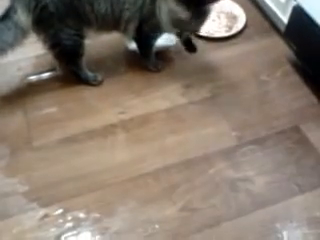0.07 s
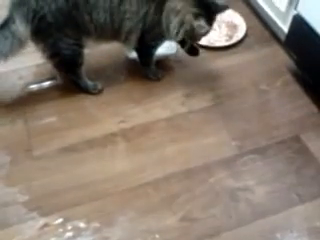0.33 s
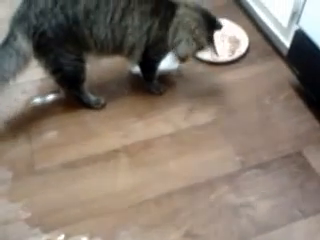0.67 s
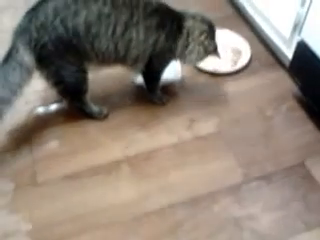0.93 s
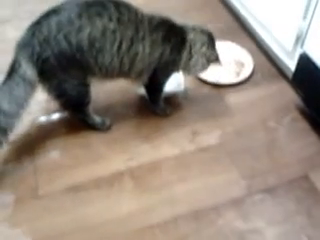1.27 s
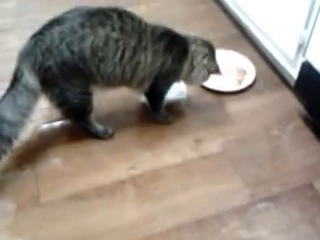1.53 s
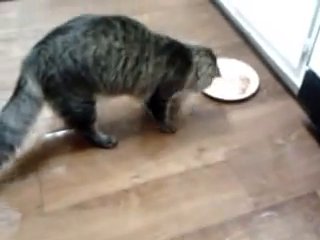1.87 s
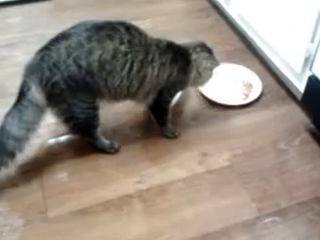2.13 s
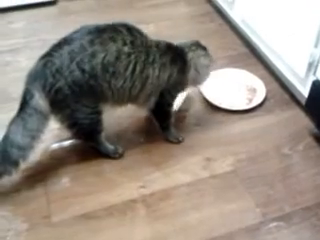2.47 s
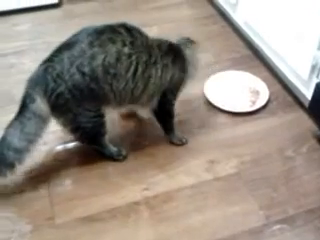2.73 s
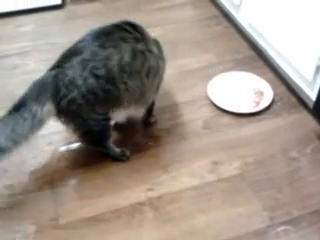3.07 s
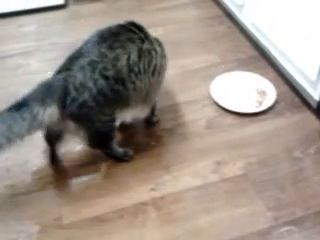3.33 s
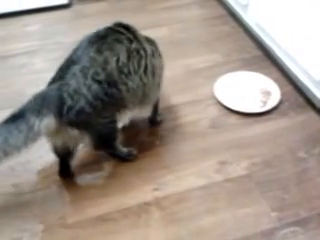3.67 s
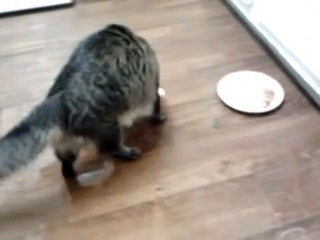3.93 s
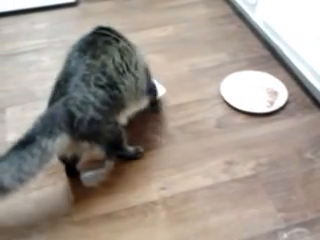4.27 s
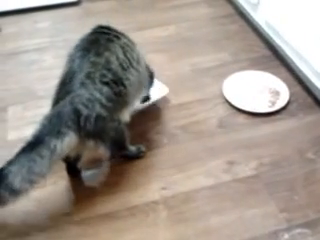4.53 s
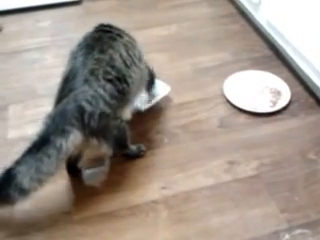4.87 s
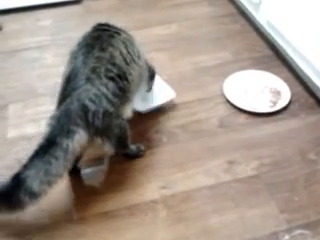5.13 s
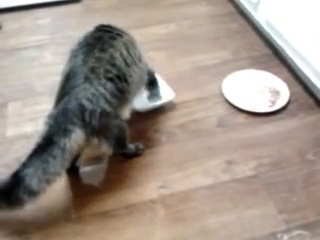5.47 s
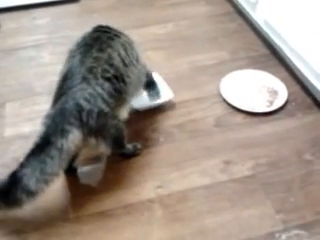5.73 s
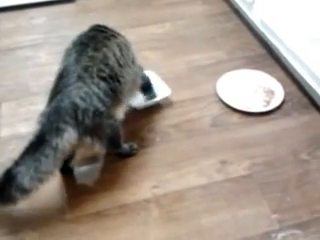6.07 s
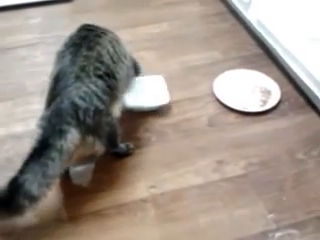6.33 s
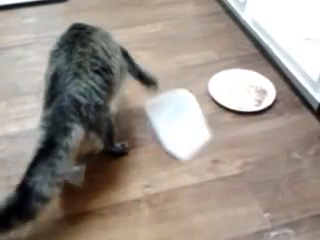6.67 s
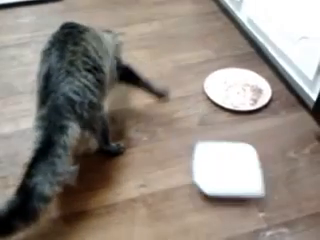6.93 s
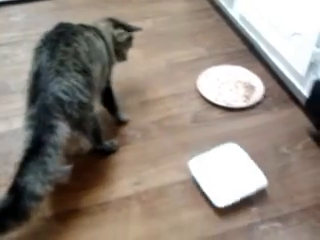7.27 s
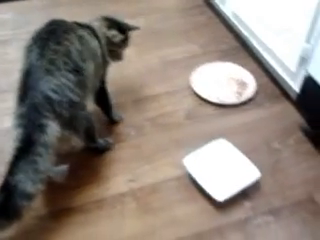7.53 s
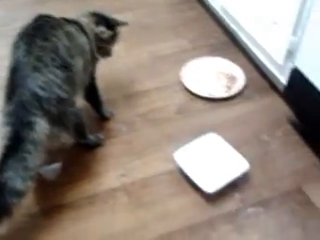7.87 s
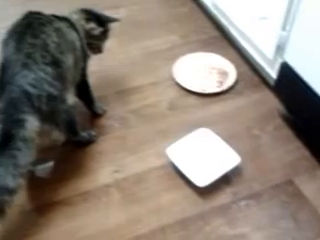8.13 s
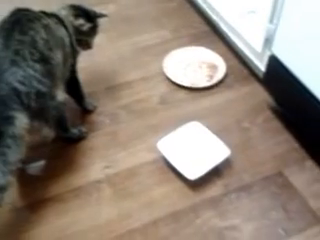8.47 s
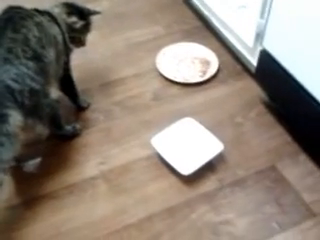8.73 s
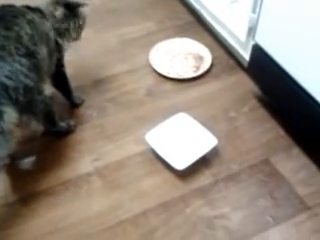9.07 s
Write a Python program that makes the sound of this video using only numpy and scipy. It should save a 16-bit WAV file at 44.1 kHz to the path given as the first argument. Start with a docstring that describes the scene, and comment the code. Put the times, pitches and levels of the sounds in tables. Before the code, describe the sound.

A low, steady rush of air fills a quiet, slightly reverberant kitchen. At about 1.8 seconds a cat's claw taps a small hard dish, which rings lightly. Two short, soft scrapes follow near 2 and 3 seconds as the dish slides on the laminate floor, mixed with faint clinks and padded thumps. Just after 4 seconds the dish tips and drops back with a clack and a hollow thud, then rocks through several smaller knocks until about 5 seconds. Light ringing taps and claw scratches continue to 6 seconds, and a brief slide comes around 6.5. Near 6.8 seconds the dish is flipped: it skids with a rasp, lands with a bright clink and bounces in the loudest clatter, thudding on the boards and settling by about 7.8 seconds. A soft paw step follows at 8 seconds and one faint scuff near 8.6.

```python
"""A cat paws a small hard dish over a laminate floor in a quiet kitchen. First its claws tap the dish
into free vibration, and stick-slip friction rasps as it is dragged. Near 4 s the dish tips and drops
back, driving the floorboards, and more clinks follow. Near 7 s it is flipped, skids, bounces and
settles upside down; one faint scuff comes last. Throughout, the small room reverberates over a low,
steady rush of air."""
import sys
import numpy as np
from scipy import signal
from scipy.fft import rfft, irfft
from scipy.io import wavfile
from scipy.ndimage import uniform_filter1d

SR = 44100
rng = np.random.default_rng(int(sys.argv[2]) if len(sys.argv) > 2 else 0)


def transcribe(u):
    """Save the signal u as a 16-bit wav file named by the first command-line argument.

    u: samples, shape (n,) or (channels, n), limited to [-1, 1]; the rate is SR.
    q: integer samples, one column per channel.
    """
    v = np.clip(np.atleast_2d(u).T, -1, 1)
    q = np.round(v * 32767).astype(np.int16)
    wavfile.write(sys.argv[1], SR, q)


N = 405719
T = np.arange(SR) / SR  # time since a blow, t/s

# landings of the dish: t/s, force level/dB, flatness (0 tilted, 1 face-on), edge level/dB,
# ring level/dB, contact spot (0 foot, 1 corner)
LANDINGS = [(3.575, -36, 0.38, -40, -35, 0), (4.176, -19.5, 0.54, -28, -31, 0.51),
            (4.191, -24, 0.72, -39, -39.5, 0.94), (4.408, -25.5, 0.38, -31, -46.5, 0),
            (4.595, -28, 0.21, -49, -44, 0.1), (4.717, -26.5, 0.32, -44.5, -50, .5),
            (4.822, -28.5, 0.34, -50, -40, 0.44), (4.893, -36.5, 0.4, -50, -52, .6),
            (6.972, -24, 0.28, -24.5, -15.5, 0.54), (7.009, -29, 0, -31.5, -19, 0.47),
            (7.195, -20.5, 1, -23.5, -29.5, 0.61), (7.213, -24, 0.53, -35, -47, .6),
            (7.305, -29, 0.67, -44, -45.5, 0.8), (7.51, -25, 0.73, -41, -32, 0.63),
            (7.647, -28.5, 0.5, -28, -49, .55), (7.727, -35, 0.69, -38, -55, 0.6)]
# modes during contact: f/Hz, level/dB, T60/s
CLACK_MODES = [(995, -3.5, 0.015), (1029, -13.5, 0.08), (1102, -10, 0.035), (1235, -11.5, 0.016),
               (778, -37, 0.81)]  # dish and board together
RIM_MODES = [(1486, 2, 0.1), (1630, 0.5, 0.12), (1850, 4, 0.088), (1860, 1.5, 0.098), (2360, -16, 0.077)]  # rim pressed on the floor
# impact spectra: f/Hz, level/dB
THUD_SPECTRUM = [(45, -39.5), (85, 0), (125, -6), (155, 0), (230, -12), (400, -22.5), (1000, -51.5)]
KNOCK_SPECTRUM = [(150, -6.5), (280, 6.5), (450, 2), (750, -4.5), (1100, -19.5), (2000, -48)]
RAP_SPECTRUM = [(300, -26), (700, -3.5), (1500, -4), (2000, -4), (2800, -5), (3500, -17.5), (4200, -11.5),
                (7000, -35.5)]
CRACK_SPECTRUM = [(1500, -8), (3000, 6.5), (4200, -5), (5100, 7), (5900, -1.5), (6500, 1.5), (7200, -8.5)]
def landings():
    """Impact excitation: the floor thuds and knocks, the hollow clacks, the rim raps, the edge cracks."""
    out = np.zeros(N)
    flip_s, loose_boards_db = 6.7, 6.5  # once flipped, the dish lands where the floor booms more
    for s, force_db, flatness, edge_db, _, _ in LANDINGS:
        t60 = np.interp(flatness, [0, 1], [0.12, 0.035])  # tilted it chatters on; flat it stops dead
        thud_db = force_db - 8 + loose_boards_db * (s > flip_s)
        clack_db = force_db + 0.5 - 23.5 * (1 - flatness)  # only a flat landing clacks fully
        add(out, s, gain_of(thud_db) * thud(THUD_SPECTRUM, t60 * 1.5, rise=0.0016, boards_db=-8.5))
        add(out, s, gain_of(force_db - 5.5) * burst(KNOCK_SPECTRUM, t60, rise=0.012))
        add(out, s, gain_of(clack_db) * struck(modes(CLACK_MODES, rise=0.0017, scatter=0.0072)))
        add(out, s, gain_of(edge_db - 2) * burst(RAP_SPECTRUM, t60, rise=0.0078))
        add(out, s, gain_of(edge_db - 17) * struck(modes(RIM_MODES, rise=0.0044, scatter=0.0024)))
        add(out, s, gain_of(edge_db - 11.5) * burst(CRACK_SPECTRUM, t60, rise=0.011))
    return out


# natural modes of the dish: f/Hz, level/dB, T60/s
DISH_MODES = [(1373, -0.5, 0.49), (2544, -5, 0.53), (2596, 0.5, 0.28), (3212, 2.5, 0.15),
              (3160, -14.5, 0.058), (4835, -18, 0.24), (5128, -11.5, 0.2), (5040, -10.5, 0.12),
              (5900, -6.5, 0.11), (5860, -12, 0.15), (6100, -7.5, 0.077), (6920, -30.5, 1)]
def dish_ring(force_spectrum, damping):
    """Modal response: each mode follows the force at its frequency, a little differently each touch."""
    rows = [(hz, db + read(force_spectrum, hz) + 1.1 * rng.standard_normal(), t60 / damping)
            for hz, db, t60 in DISH_MODES]
    return modes(rows, rise=0.00081, scatter=0.00054)


# claw or pad taps on the dish: t/s, level/dB, sharpness (lift of the top modes)/dB
TAPS = [(1.7531, -38.5, 0), (2.2414, -49, -25), (2.3002, -47, 4.5), (2.627, -55, 2), (2.9105, -61.5, 16.5),
        (3.0046, -45.5, 0.5), (3.1182, -43, 3.5), (4.803, -43.5, 12.5), (5.1157, -37, 5.5),
        (5.4486, -42.5, 16), (5.7264, -34.5, 7), (5.7769, -38.5, -1), (5.795, -50, -21),
        (5.9029, -47.5, -7), (5.957, -43, -4.5), (5.981, -51, -24)]
# breakpoints of a landing's force spectrum: f/Hz
LANDING_BANDS = [1450, 2400, 2750, 3000, 3500, 4500]
def ringing():
    """Free vibration after taps and landings: hard contact wakes the top modes, the floor adds damping."""
    out = np.zeros(N)
    for s, db, sharp_db in TAPS:
        lowest_db = -0.5 - 0.52 * sharp_db  # a soft touch favours the lowest mode
        force_spectrum = [(1450, lowest_db), (2400, 0.46), (3300, -3.3), (4600, sharp_db)]
        add(out, s, gain_of(db) * dish_ring(force_spectrum, damping=1.0))
    for s, _, _, edge_db, ring_db, spot in LANDINGS:
        middle_db = ring_db - 3
        corner_db = ring_db + np.interp(spot, [0, 1], [-17.5, 15])  # the 3.2 kHz mode answers the corner
        levels_db = [ring_db - 13, middle_db, middle_db, corner_db, corner_db, edge_db - 7]
        add(out, s, dish_ring(list(zip(LANDING_BANDS, levels_db)), damping=1.32))
    return out


def scratches():
    """Contact noise: a claw scratches briefly at each tap, the louder the sharper it is."""
    out = np.zeros(N)
    for s, db, sharp_db in TAPS:
        add(out, s, gain_of(db + sharp_db - 13.5) * burst(CRACK_SPECTRUM, t60=0.29, rise=0.0016))
    return out


# dish slides and paw scuffs: t/s, duration/s, rumble level/dB, grit level/dB, singing level/dB
SLIDE_STROKES = [(1.922, 0.26, -36.5, -65, -51), (2.736, 0.46, -38, -65, -50.5),
                 (6.42, .15, -36, -67, -52.5), (6.77, .175, -25.5, -36.5, -46.5),
                 (8.608, 0.11, -39, -58.5, -72)]
# contact spectra: f/Hz, level/dB
SOFT_SPECTRUM = [(35, -30.5), (70, 5), (145, 0), (220, -2), (330, 1.5), (500, -13.5), (900, -11.5),
                 (2000, -34.5)]  # the floor under a soft load
GRIT_SPECTRUM = [(200, -28), (600, -11.5), (1200, 2.5), (2000, 6), (2900, 2), (4000, -10.5), (5200, -12),
                 (7200, -34)]  # the rasping rim
RUB_SPECTRUM = [(1400, -5), (2600, -1), (3200, 5.5), (4800, 5.5), (5130, 6), (5500, -12.5)]  # friction force on the dish's modes
# high mode woken by hard scraping: f/Hz, level/dB, T60/s
SQUEAL_MODE = [(5130, -4, .2)]
def slides():
    """Stick-slip friction: tiny uneven catches shake the floor, rasp the rim and keep the dish singing."""
    t = np.arange(N) / SR
    rumble, grit, song = np.zeros((3, N))
    for start, duration, rumble_db, grit_db, song_db in SLIDE_STROKES:
        speed = np.interp((t - start) / duration, [0, 0.43, 1], [0, 1, 0])  # speeds up, slows to rest
        rumble += gain_of(rumble_db) * speed ** 0.82
        grit += gain_of(grit_db) * speed ** 1.64
        song += gain_of(song_db) * speed ** 0.9
    chatter_db = 2.1 * evened(uniform_filter1d(rng.standard_normal(N), size=400))
    caught = rng.random(N) < 5000 / SR  # about 5000 catches a second
    catches = evened(caught * rng.standard_normal(N) * gain_of(chatter_db))
    rasp = gain_of(7.5) * grit * coloured(catches, GRIT_SPECTRUM)
    rim_response = modes(RIM_MODES + SQUEAL_MODE, rise=0.0012, scatter=0.0053)
    rim = gain_of(3) * excited(grit * catches, rim_response)
    floor = gain_of(-3) * rumble * coloured(catches, SOFT_SPECTRUM)
    singing = excited(song * catches, dish_ring(RUB_SPECTRUM, damping=2.2))
    return floor + rasp + rim + singing


# light contacts with the floor: t/s, level/dB
SOFT_FALLS = [(1.995, -29), (2.029, -26), (2.882, -22.5), (2.918, -22.5), (3.273, -28), (3.339, -37),
              (4.128, -24), (4.821, -30), (6.057, -25.5), (6.109, -27), (6.495, -32), (7.152, -14.5),
              (7.967, -36)]  # paws, and the dish rocking
CLAW_TICKS = [(3.3302, -47), (3.7229, -42), (6.4811, -35), (8.0022, -49)]
def steps():
    """Contact time limits bandwidth: padded blows reach the low floor modes, a bare claw ticks."""
    out = np.zeros(N)
    for s, db in SOFT_FALLS:
        add(out, s, gain_of(db - 14.5) * thud(SOFT_SPECTRUM, t60=0.087, rise=0.017, boards_db=4.5))
    for s, db in CLAW_TICKS:
        add(out, s, gain_of(db - 10.5) * burst(CRACK_SPECTRUM, t60=0.066, rise=0.0024))
    return out


# modes of the floating floor: f/Hz, level/dB, T60/s
FLOOR_MODES = [(83.5, -14, 0.14), (123.6, -0.5, 0.14), (141.3, -8.5, 0.39), (242, -6, 0.3),
               (294, -4.5, 0.28)]
def thud(spectrum, t60, rise, boards_db):
    """Plate vibration: the floor gives under a blow and its boards ring on."""
    blow = burst(spectrum, t60, rise)
    boards = struck(modes(FLOOR_MODES, rise=0.0023, scatter=0.01))
    return struck(blow + gain_of(boards_db) * boards)


# reverberation time of the kitchen: f/Hz, T60/s
ROOM_DECAY = [(100, 0.53), (400, 0.51), (1000, 0.45), (3000, 0.4), (7000, 0.38)]
def room(x, spacing=22):
    """Reverberation: dense reflections off cupboards and walls, each band absorbed at its own rate."""
    reflections = np.zeros(SR)
    slots = np.arange(8 * spacing, SR - spacing, spacing)
    reflections[slots + rng.integers(0, spacing, len(slots))] = rng.choice([-1, 1], len(slots))
    hz, t, bands = signal.stft(reflections, SR, nperseg=256)
    decay = np.exp(-np.log(1000) * t / read(ROOM_DECAY, hz)[:, None])
    return excited(x, signal.istft(bands * decay, SR)[1])


# spectrum of the room's air noise: f/Hz, level/dB
AIR_SPECTRUM = [(19, -45.5), (32, -0.5), (59, -15.5), (76, -2.5), (127, 1), (175, -11.5), (201, -9),
                (225, 2), (269, -11), (338, -8), (497, -11.5), (1120, -12.5), (3180, -27.5), (4370, -25),
                (7200, -31), (9360, -71), (15800, -120)]
def rush():
    """Broadband background noise: a low rush of air whose level wavers slightly."""
    t = np.arange(N) / SR
    waver = evened(sum(np.sin(2 * np.pi * (hz * t + rng.random())) for hz in np.geomspace(0.3, 9, 10)))
    return gain_of(-43.5 + 0.11 * waver) * coloured(rng.standard_normal(N), AIR_SPECTRUM)


def modes(rows, rise, scatter):
    """Superposition of damped sines, each detuned at random by a relative spread of scatter."""
    out = np.zeros(len(T))
    for hz, db, t60 in rows:
        detuned_hz = hz * (1 + scatter * rng.standard_normal())
        out += gain_of(db) * dying(t60, rise) * np.sin(2 * np.pi * (detuned_hz * T + rng.random()))
    return out


def burst(spectrum, t60, rise):
    """Modal overlap: countless modes dying together merge into decaying noise."""
    return struck(coloured(rng.standard_normal(len(T)), spectrum) * dying(t60, rise))


def dying(t60, rise):
    """Exponential damping: an onset of time constant rise/s, then a fall of 60 dB in t60/s."""
    return (1 - np.exp(-T / rise)) * np.exp(-np.log(1000) * T / max(t60, 1e-3))


def excited(drive, response):
    """Forced response: the drive convolved with an impulse response of unit energy."""
    return signal.fftconvolve(drive, response / np.linalg.norm(response))[:N]


def coloured(x, spectrum):
    """Spectral shaping of x, at rms 1."""
    hz = np.fft.rfftfreq(len(x), 1 / SR)
    return evened(irfft(rfft(x) * gain_of(read(spectrum, hz)), len(x)))


def read(points, hz):
    """Interpolation on a log-frequency axis."""
    f, value = np.transpose(points)
    return np.interp(np.log(hz + 1), np.log(f + 1), value)


def gain_of(db):
    """Decibels to amplitude."""
    return 10 ** (np.asarray(db) / 20)


def evened(x):
    """Normalisation to rms 1."""
    return x / np.sqrt(np.mean(x ** 2) + 1e-20)


def struck(x):
    """Normalisation of a blow to rms 1 over its first 30 ms."""
    return x / np.sqrt(np.mean(x[:1300] ** 2) + 1e-20)


def add(mix, s, sound):
    """Superposition of a sound on the mix at time s."""
    part = mix[round(s * SR):][:len(sound)]
    part += sound[:len(part)]


def scene():
    """Direct plus reverberant field: the floor fills the room, the small dish is heard more directly."""
    blows = landings() + scratches() + steps() + slides()
    ring = ringing()
    direct = gain_of(1) * (blows + ring)
    reverberant = gain_of(-4.5) * room(blows + gain_of(-2.5) * ring)
    return (direct + reverberant + rush())[None]


def record(dry):
    """Band limiting: a steep low-pass filter removes the top treble."""
    cutoff_hz = 7280
    lowpass = signal.firwin(401, cutoff_hz, window=("kaiser", 8), fs=SR)
    return signal.oaconvolve(dry, lowpass[None], "same")


dry = scene()
out = record(dry)
transcribe(out)
```